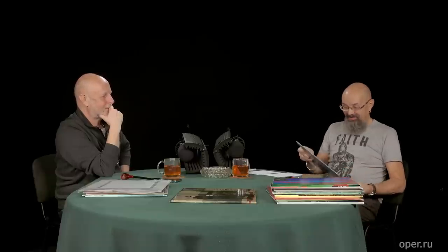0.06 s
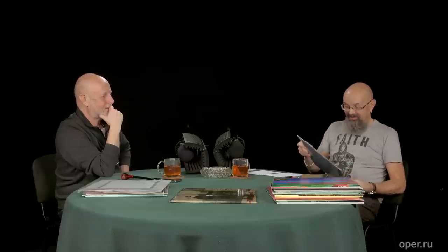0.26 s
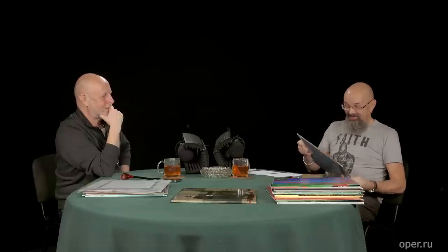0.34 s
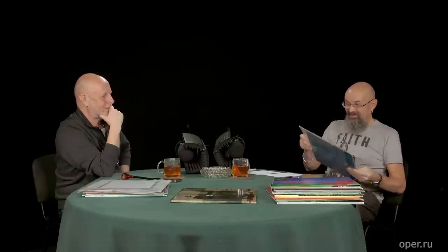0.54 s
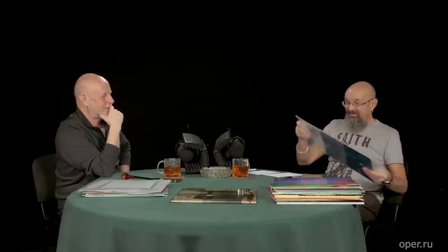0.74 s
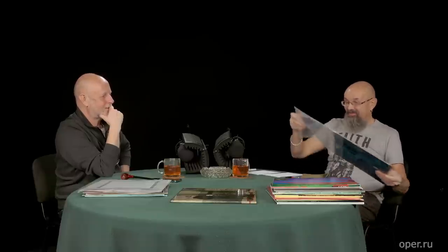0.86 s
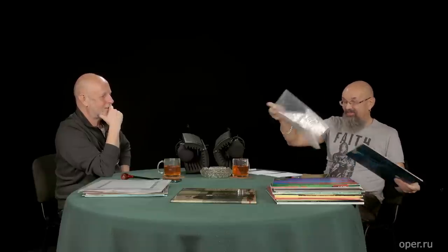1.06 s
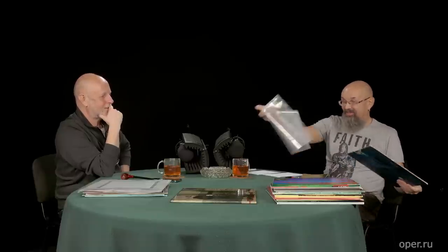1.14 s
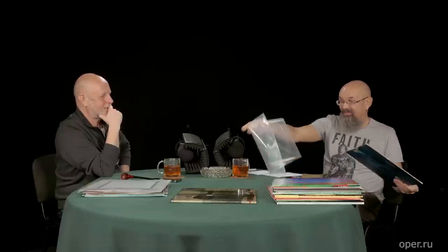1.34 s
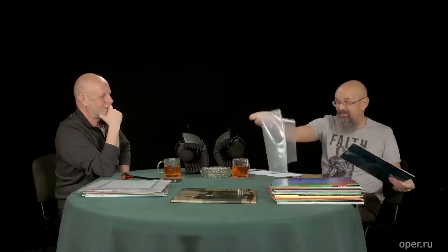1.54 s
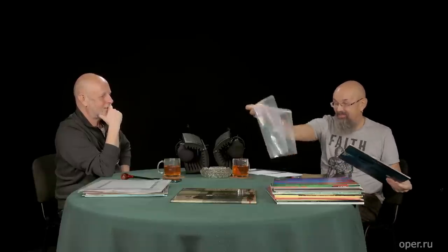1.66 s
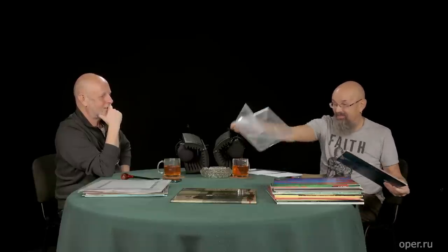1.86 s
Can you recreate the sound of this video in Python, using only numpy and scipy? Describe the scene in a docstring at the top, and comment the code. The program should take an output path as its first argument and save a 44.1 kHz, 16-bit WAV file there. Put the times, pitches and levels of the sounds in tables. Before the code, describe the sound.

A thin plastic sleeve rustles as a record is pulled out. A few crackles lead into a bright sliding hiss with soft cardboard thumps, then the loose plastic snaps and crumples, on one microphone in a quiet studio.

```python
"""A grainy hiss with sharp crackles and soft thumps: a record is drawn out of a thin plastic sleeve.
The film hisses as it slides, its creases snap and ring briefly, and the loose film crumples.
The card jacket bends with low puffs. One microphone hears it all in a quiet studio,
with a short echo on the film and a faint room tone underneath."""
import sys
import numpy as np
from scipy import signal
from scipy.fft import rfft, irfft, next_fast_len
from scipy.io import wavfile
from scipy.ndimage import uniform_filter1d, map_coordinates

SR = 44100
rng = np.random.default_rng(int(sys.argv[2]) if len(sys.argv) > 2 else 0)


def put_to_file(sound):
    """Save the sound as 16-bit audio at rate SR, in the file named by the first command-line argument."""
    columns = np.atleast_2d(sound).T  # one column per channel
    safe = np.clip(columns, -1, 1)
    whole_steps = np.round(safe * 32767)
    wavfile.write(sys.argv[1], SR, whole_steps.astype(np.int16))


N = 83790


def amp(db):
    """Turn decibels into a gain."""
    return 10 ** (np.asarray(db) / 20)


def unit(x):
    """Scale a sound to an average (rms) level of 1."""
    return x / np.sqrt(np.mean(x ** 2) + 1e-20)


def along(points, hz):
    """Read between (frequency, value) points on a log frequency axis."""
    freqs, values = np.transpose(points)
    return np.interp(np.log(hz + 1), np.log(freqs + 1), values)


def envelope(rows):
    """Turn (time, decibels) points into a gain for every sample."""
    times, levels = np.transpose(rows)
    return amp(np.interp(np.arange(N) / SR, times, levels))


def filtered(x, response):
    """Give each frequency the gain that response(hz) asks for."""
    size = next_fast_len(len(x) + 8192)
    return irfft(rfft(x, size) * response(np.fft.rfftfreq(size, 1 / SR)), size)[:len(x)]


def band(x, low_hz, high_hz):
    """Keep a band with a soft low edge and a steep high edge."""
    x = signal.sosfilt(signal.butter(1, low_hz, "high", fs=SR, output="sos"), x)
    return signal.sosfilt(signal.butter(5, min(high_hz, SR / 2.2), fs=SR, output="sos"), x)


def patchy(x, depth_db):
    """Make a sound flicker in small random patches of pitch and time."""
    spectrum = signal.stft(x, nperseg=256)[2]
    patches = uniform_filter1d(rng.standard_normal(spectrum.shape), size=9, axis=0)
    patches = unit(uniform_filter1d(patches, size=9, axis=1))
    return unit(signal.istft(spectrum * amp(depth_db * patches), nperseg=256)[1][:N])


def grains(tone, per_second, spread_db, clump_db, clump_hz, hiss):
    """Uneven random ticks over smooth hiss, swelling in clumps and shaped by a tone table."""
    happens = rng.random(N) < per_second / SR
    sizes = amp(spread_db * rng.exponential(size=N))
    ticks = unit(happens * sizes * rng.standard_normal(N))
    texture = ticks + hiss * rng.standard_normal(N)
    swell = map_coordinates(rng.standard_normal(N), [np.arange(N) * clump_hz / SR])
    return unit(filtered(texture * amp(clump_db * swell), lambda hz: amp(along(tone, hz))))


def room_tone():
    """The quiet studio: faint, steady noise, mostly bass."""
    # Tone of the noise: (frequency [Hz], relative level [dB])
    tone = [(30, -90), (60, -5.5), (106, 1.5), (200, -6.5), (300, -17), (500, -34.5), (1500, -27),
            (4000, -30.5), (9000, -44.5), (16000, -52)]
    return amp(-61) * unit(filtered(rng.standard_normal(N), lambda hz: amp(along(tone, hz))))


def room_echo(x):
    """The studio answers softly; each fifth of a second gets its own short tail of fading noise."""
    # How long the echo lasts: (frequency [Hz], time to fade by 60 dB [s])
    fade_times = [(200, 0.2), (2000, 0.14), (10000, 0.11)]
    out = np.zeros(N + SR)
    step, delay = SR // 5, 200  # samples
    for i in range(0, N, step):
        hz, t, noise = signal.stft(rng.standard_normal(SR // 3), SR, nperseg=256)
        fade = amp(-60 * t / along(fade_times, hz)[:, None])
        tail = signal.istft(noise * fade, SR, nperseg=256)[1]
        echo = signal.fftconvolve(x[i:i + step], tail / np.linalg.norm(tail))
        out[i + delay:][:len(echo)] += echo
    return out[:N]


def jacket_flex():
    """The handled jacket rumbles, and thumps softly when it is knocked or bent."""
    # Knocks and bends: (time [s], pitch [Hz], level [dB], length [s])
    thumps = [(.075, 150, -50, 0.01), (0.328, 310, -43.5, 0.0073), (0.397, 303, -46, 0.0085),
              (0.417, 250, -38.5, 0.0055), (0.474, 300, -36.5, 0.0048), (0.612, 398, -29, 0.0098),
              (.62, 186, -32.5, 0.018), (.675, 179, -41, 0.01), (.725, 187, -34, 0.0081),
              (.787, 144, -40, 0.016), (0.797, 379, -37, 0.017), (0.867, 266, -39.5, 0.02),
              (.925, 152, -43, 0.01), (.975, 115, -42, .02), (1.101, 139, -38.5, 0.016),
              (1.2393, 310, -34, 0.0096), (1.255, 232, -38, 0.014), (1.283, 137, -46, 0.019),
              (1.426, 346, -39.5, 0.0078), (1.532, 335, -37, 0.0043)]
    # Loudness of the rumble: (time [s], level [dB])
    levels = [(0, -65.5), (.3, -61), (.5, -60), (.585, -65), (.62, -53.5), (.8, -54.5), (.98, -52.5),
              (1.03, -64), (1.1, -56), (1.17, -63), (1.26, -55), (1.34, -64), (1.55, -63.5), (1.75, -63.5),
              (1.9, -75.5)]
    # Tone of the rumble: (frequency [Hz], relative level [dB])
    tone = [(45, -51), (70, -19), (120, -0.5), (200, -1), (350, -2.5), (600, -10.5), (1200, -37)]
    out, t = np.zeros(N + SR), np.arange(4096) / SR
    for start, hz, db, length in thumps:
        age = t / length
        puff = age * np.exp(1 - np.e * age * age)  # swells, then dies away
        roughness = 0.4 * unit(band(rng.standard_normal(len(t)), hz, hz * 2))
        wave = np.sin(2 * np.pi * hz * t) + roughness
        out[round(start * SR):][:len(t)] += amp(db) * puff * wave
    rumble = grains(tone, per_second=300, spread_db=0.5, clump_db=2, clump_hz=30, hiss=1.5)
    return out[:N] + envelope(levels) * rumble


def film_crumple():
    """The loose film folds into small creases, too many to count."""
    # Loudness of the crumpling: (time [s], level [dB])
    levels = [(0, -63), (.14, -63.5), (.27, -59), (.38, -62.5), (.53, -63), (.62, -53.5), (.8, -52),
              (.9, -55.5), (.96, -44.5), (1.03, -66.5), (1.11, -42.5), (1.18, -74), (1.25, -39.5),
              (1.29, -54), (1.33, -68), (1.4, -79), (1.44, -56), (1.5, -78), (1.55, -66), (1.6, -73),
              (1.715, -65), (1.725, -58), (1.76, -61.5), (1.8, -71.5), (1.9, -80)]
    # Tone of the crumpling: (frequency [Hz], relative level [dB])
    tone = [(300, -35), (600, 3), (1300, -2), (3000, -2.5), (7000, -25), (14000, -23)]
    creases = grains(tone, per_second=700, spread_db=1.06, clump_db=3.84, clump_hz=60.18, hiss=1.0)
    return envelope(levels) * creases


def film_slide():
    """Tiny slips of film on card blend into a bright hiss."""
    # Loudness of the sliding: (time [s], level [dB])
    levels = [(0, -60.5), (.1, -55.5), (.2, -56.5), (.24, -41), (.3, -45), (.35, -46.5), (.38, -66.5),
              (.44, -53), (.5, -60), (.55, -47.5), (.585, -34.5), (.605, -36.5), (.622, -34.5), (.65, -35),
              (.69, -39.5), (.73, -35.5), (.775, -39), (.815, -34), (.835, -36.5), (.865, -33.5),
              (.9, -40.5), (.925, -35.5), (.94, -37), (.96, -35.5), (.98, -42.5), (1.0, -53.5), (1.05, -57),
              (1.11, -48), (1.14, -58), (1.19, -64.5), (1.27, -48), (1.32, -69.5), (1.6, -68.5),
              (1.65, -63), (1.715, -66), (1.725, -62), (1.77, -65.5), (1.9, -68)]
    # Tone of the sliding: (frequency [Hz], relative level [dB])
    tone = [(900, -22), (1500, -19.5), (3000, -10.5), (5000, -2), (7000, 1), (8500, 0.5), (11000, -4.5),
            (13000, -12), (16000, -17)]
    slips = grains(tone, per_second=4000, spread_db=0.69, clump_db=1.1, clump_hz=150, hiss=1.77)
    return envelope(levels) * patchy(slips, depth_db=1.56)


def crease_snaps():
    """Each crease cracks brightly and rings the film for a moment before the fingers damp it."""
    # Snapping creases: (time [s], ring pitch [Hz], ring level [dB], ring length [s],
    # crack low edge [Hz], crack high edge [Hz], crack level [dB], crack time to fade by 60 dB [s])
    snaps = [(0.041, 790, -51, 0.0023, 2500, 8500, -56, 0.0074),
             (0.0687, 940, -43.5, 0.0023, 3200, 9200, -45.5, 0.0087),
             (0.123, 570, -51, 0.0012, 2720, 8200, -57, 0.0064),
             (0.1463, 1280, -44.5, 0.0028, 1900, 7900, -42, 0.0069),
             (0.2024, 575, -54, 0.0016, 2700, 5970, -43.5, 0.0085),
             (0.3268, 930, -28.5, 0.0042, 3130, 8450, -32.5, 0.013),
             (0.398, 910, -36.5, 0.0015, 2300, 5200, -40.5, 0.012),
             (0.4136, 950, -41, 0.0051, 3760, 7850, -26, 0.0096),
             (0.4679, 878, -30.5, 0.0045, 2560, 7500, -31, 0.0073),
             (0.5896, 420, -40, 0.0018, 7700, 11800, -22.5, 0.0046),
             (0.5933, 2620, -53, 0.0016, 7260, 11000, -33, 0.008),
             (0.6178, 407, -40.5, 0.0025, 2600, 9300, -31, 0.012),
             (0.635, 454, -25, 0.00096, 2500, 9000, -53, 0.008),
             (0.674, 840, -32.5, 0.0026, 2100, 10100, -35, 0.0094),
             (0.787, 2140, -30.5, 0.0016, 2360, 8000, -21, 0.0083),
             (0.806, 1345, -28.5, 0.0031, 2290, 8200, -29, 0.017),
             (0.8727, 774, -39.5, 0.0036, 2600, 8800, -27.5, 0.0053),
             (0.936, 1028, -27.5, 0.0012, 3600, 9250, -36.5, 0.008),
             (0.953, 1460, -32, 0.003, 1900, 8800, -52, 0.0071),
             (0.9658, 1040, -37.5, 0.0025, 2200, 8650, -28.5, 0.012),
             (1.01, 1160, -42, 0.0018, 2200, 9700, -41.5, 0.0093),
             (1.0338, 1460, -43, 0.0017, 1800, 6700, -60, 0.008),
             (1.067, 2660, -41, 0.001, 2400, 11000, -36, 0.011),
             (1.0914, 1090, -14.5, 0.0004, 3400, 13500, -19.5, 0.016),
             (1.0945, 1320, -24.5, 0.0011, 1900, 4070, -33.5, 0.011),
             (1.1082, 1440, -29.5, 0.0026, 2000, 7600, -27, 0.0086),
             (1.1105, 1560, -43, 0.0025, 8000, 12500, -25.5, 0.0046),
             (1.1608, 1860, -42, 0.0017, 1800, 2800, -51, 0.008),
             (1.2095, 1860, -36.5, 0.0044, 1870, 8300, -34.5, 0.017),
             (1.24, 547, -29.5, 0.0033, 1210, 6500, -24.5, 0.0094),
             (1.2428, 1580, -26, 0.0016, 6100, 12000, -20.5, 0.008),
             (1.2545, 1530, -39, 0.0023, 1900, 6600, -55, 0.009),
             (1.2629, 1594, -27.5, 0.0031, 1890, 7340, -23, 0.0069),
             (1.278, 1810, -43, 0.0072, 1800, 3200, -59, 0.0071),
             (1.351, 870, -49.5, 0.003, 1900, 8500, -61, 0.008),
             (1.396, 410, -66, 0.0016, 2000, 8800, -53.5, 0.0062),
             (1.4226, 2560, -51, 0.00052, 1980, 5860, -34.5, 0.021),
             (1.427, 2110, -22, 0.00055, 2460, 6000, -34, 0.0061),
             (1.4604, 410, -67, 0.0018, 4500, 9100, -51, 0.008),
             (1.483, 410, -72, 0.0018, 3000, 8700, -47.5, 0.012),
             (1.5033, 410, -64, 0.0018, 2300, 9200, -48, 0.008),
             (1.5308, 2520, -31, 0.003, 2130, 6600, -31, 0.0086),
             (1.5499, 2820, -48, 0.002, 2600, 5400, -51, 0.008),
             (1.6019, 700, -62, 0.0018, 2800, 5300, -51.5, 0.008),
             (1.621, 450, -60, 0.0018, 2000, 8700, -55, 0.009),
             (1.673, 2490, -51, 0.0023, 1900, 7500, -69, 0.008),
             (1.7243, 2030, -48, 0.0034, 1900, 8500, -47.5, 0.0073)]
    out, t = np.zeros(N + SR), np.arange(2048) / SR
    for start, ring_hz, ring_db, length, low_hz, high_hz, crack_db, decay in snaps:
        crack_noise, ring_noise = rng.standard_normal((2, len(t)))
        rise = 1 - np.exp(-t / 0.0003)
        fade = np.exp(-(t / max(length, 0.0005)) ** 2)
        roughness = 0.16 * unit(band(ring_noise, ring_hz / 2, ring_hz * 2))
        ring = rise * fade * (np.sin(2 * np.pi * ring_hz * t) + roughness)
        crack = band(crack_noise * amp(-60 * t / decay), low_hz, high_hz)
        crack /= np.sqrt(np.sum(crack ** 2) / (decay * SR / np.log(1e6)))  # starts near level 1
        out[round(start * SR):][:len(t)] += amp(ring_db) * ring + amp(crack_db) * crack
    return out[:N]


def scene():
    """Film, echo, jacket and room tone reach one microphone, so both channels are the same."""
    film = crease_snaps() + film_slide() + film_crumple()
    mono = room_tone() + film + amp(-15) * room_echo(film) + jacket_flex()
    return np.array([mono, mono])


def record(dry):
    """Soften the highest treble, cut the deepest bass and remove everything above a top limit."""
    treble_hz, bass_hz, top_hz = 12300, 58, 16100
    dry = signal.sosfilt(signal.butter(4, treble_hz, fs=SR, output="sos"), dry)
    dry = signal.sosfilt(signal.butter(3, bass_hz, "high", fs=SR, output="sos"), dry)
    return np.array([filtered(channel, lambda hz: hz < top_hz) for channel in dry])


dry = scene()
out = record(dry)
put_to_file(out)
```